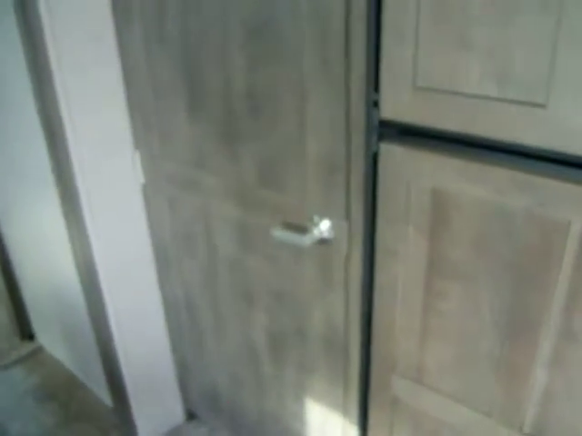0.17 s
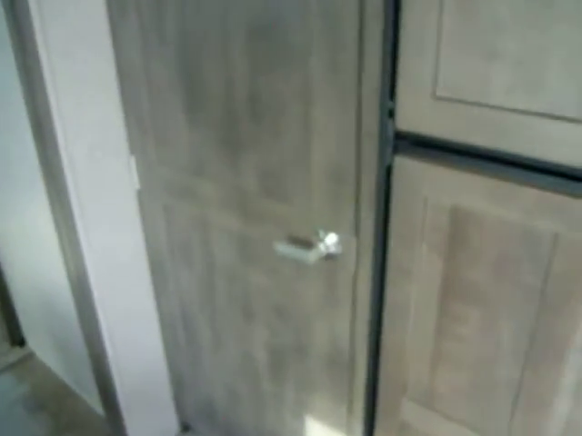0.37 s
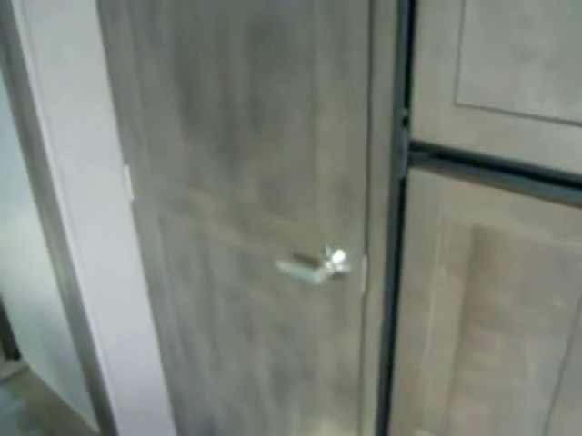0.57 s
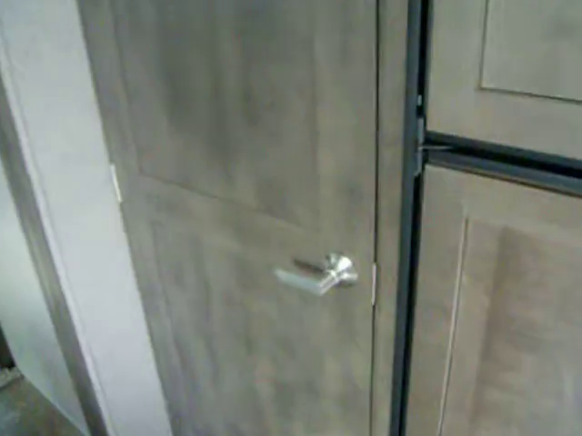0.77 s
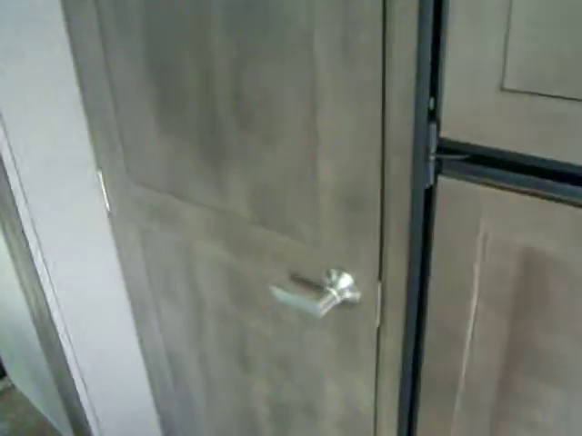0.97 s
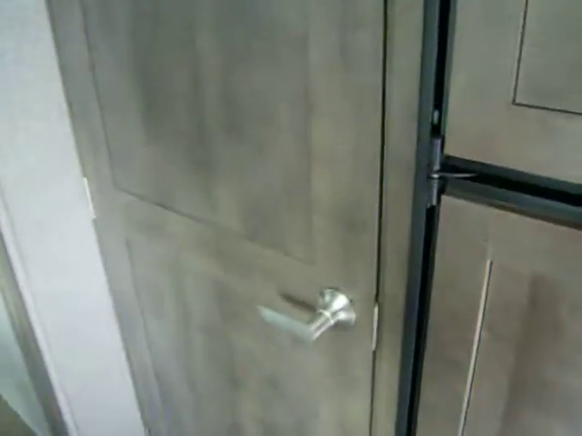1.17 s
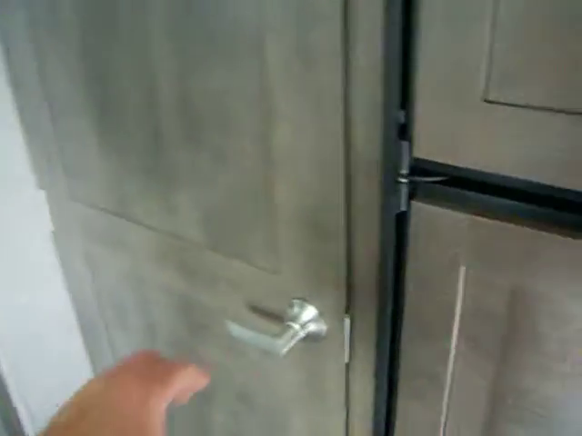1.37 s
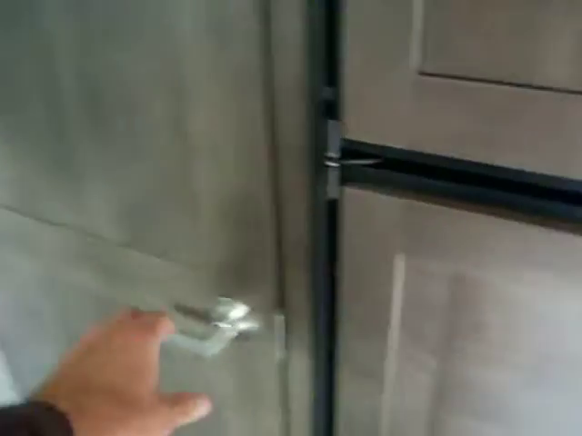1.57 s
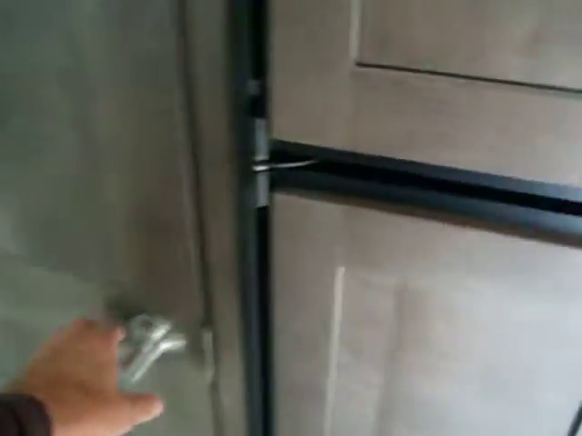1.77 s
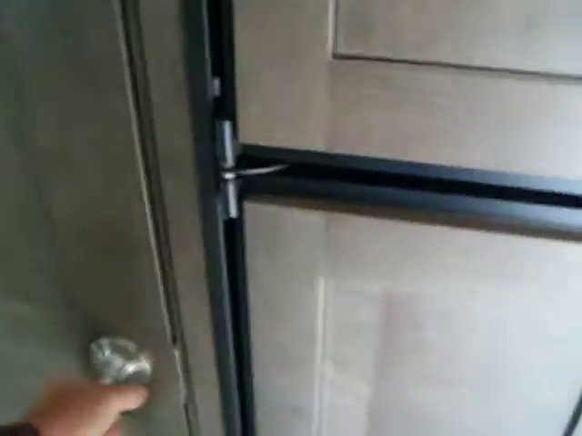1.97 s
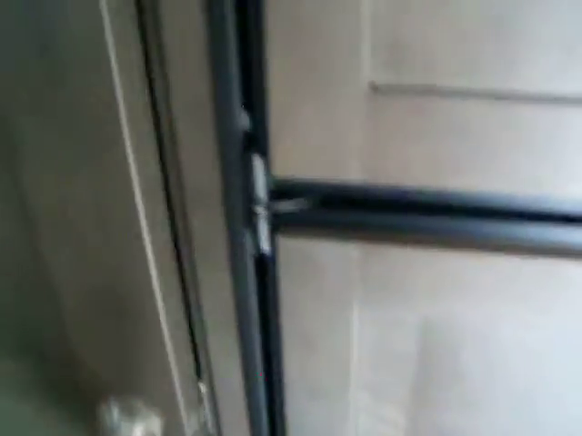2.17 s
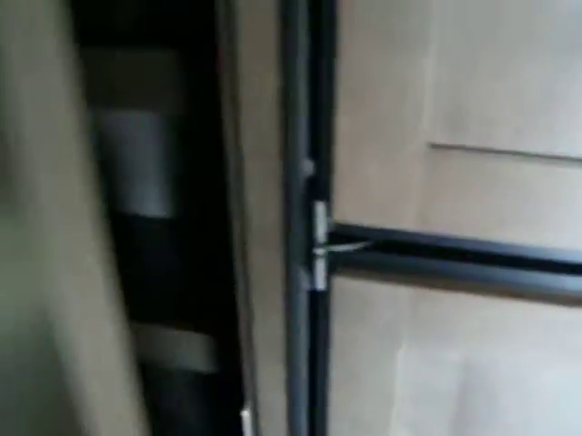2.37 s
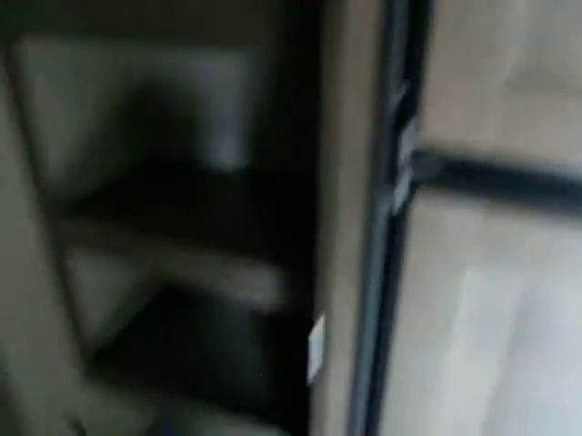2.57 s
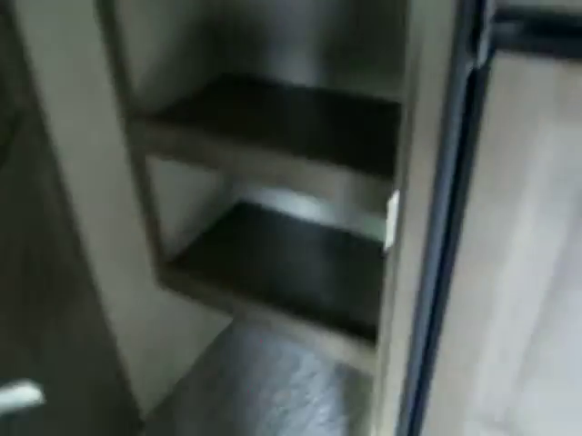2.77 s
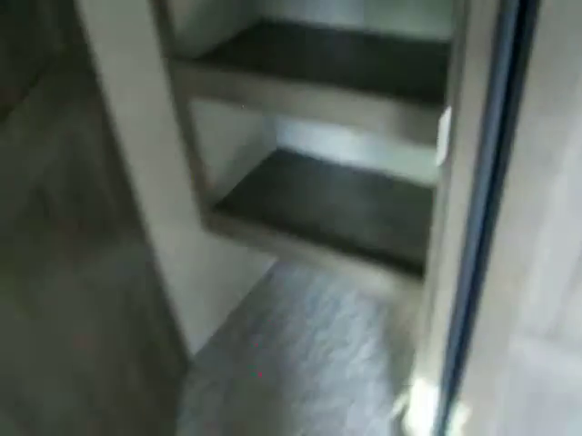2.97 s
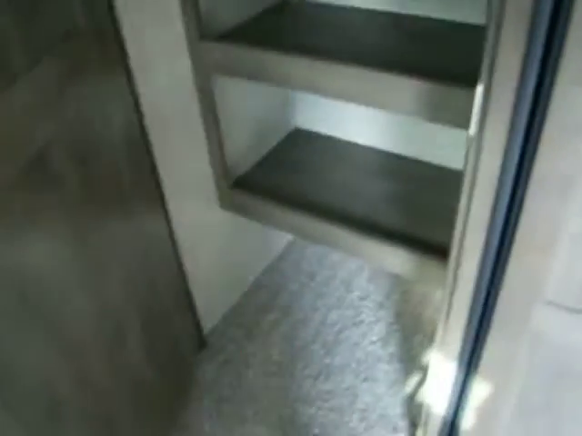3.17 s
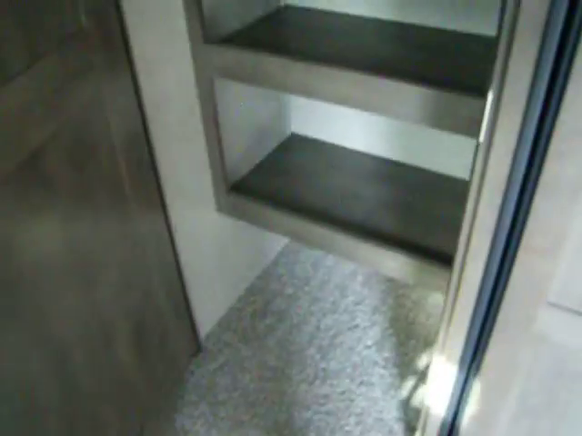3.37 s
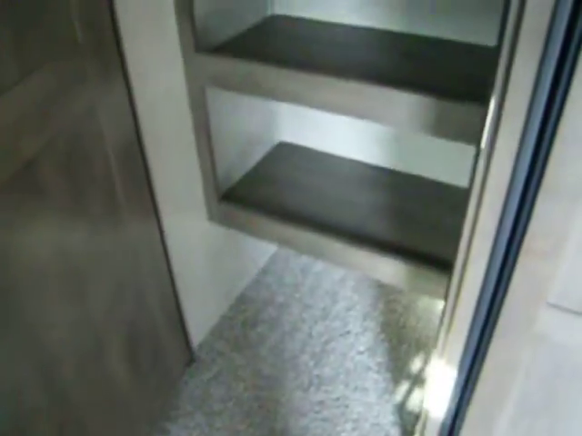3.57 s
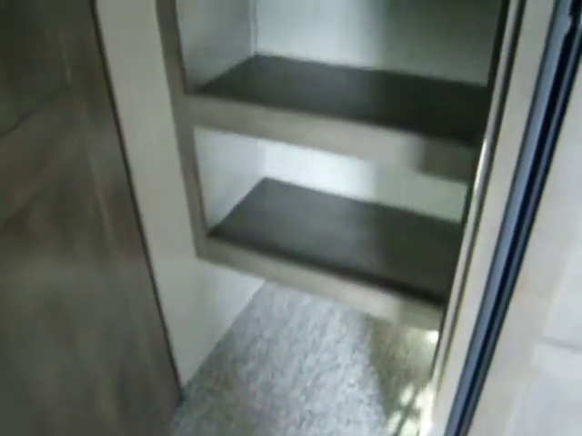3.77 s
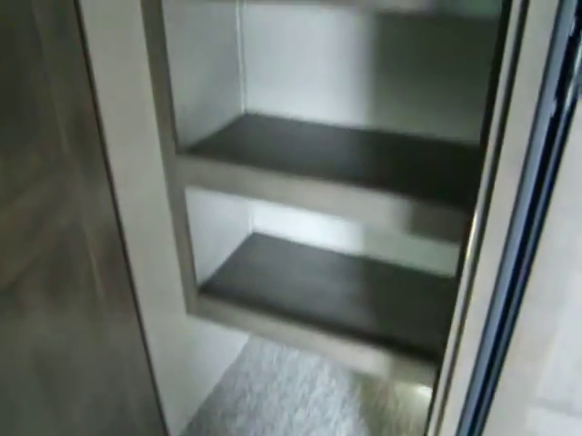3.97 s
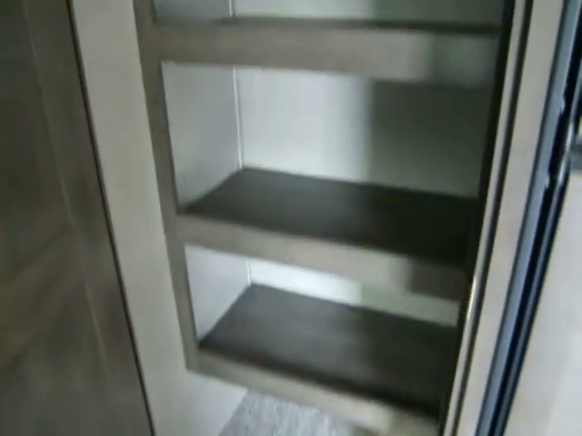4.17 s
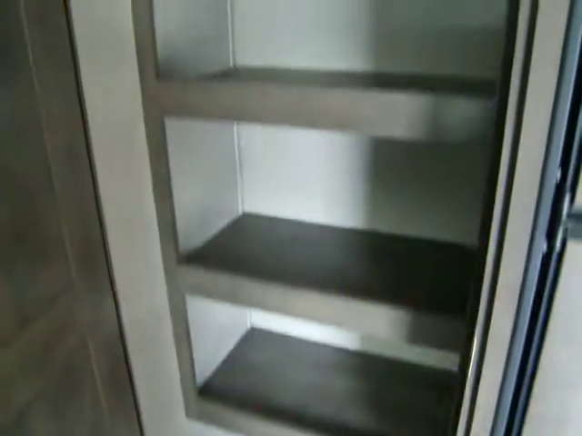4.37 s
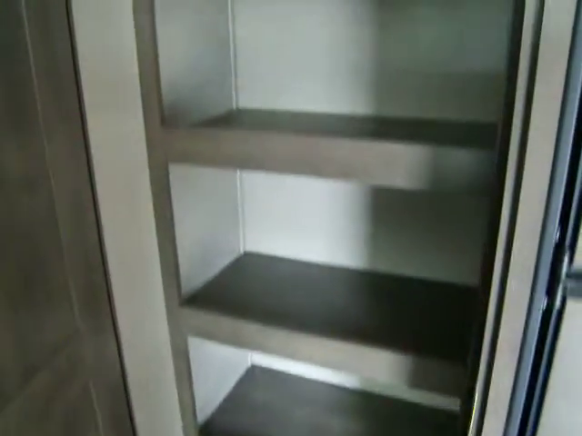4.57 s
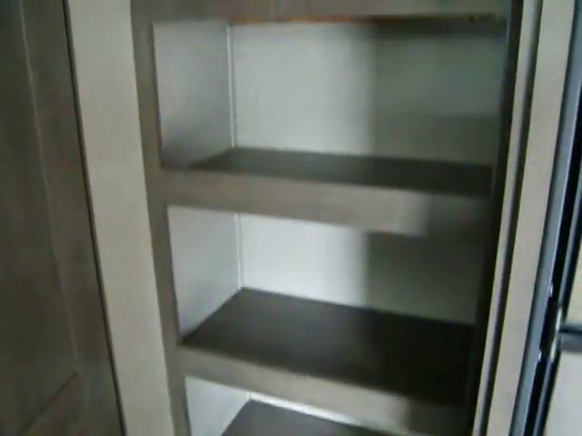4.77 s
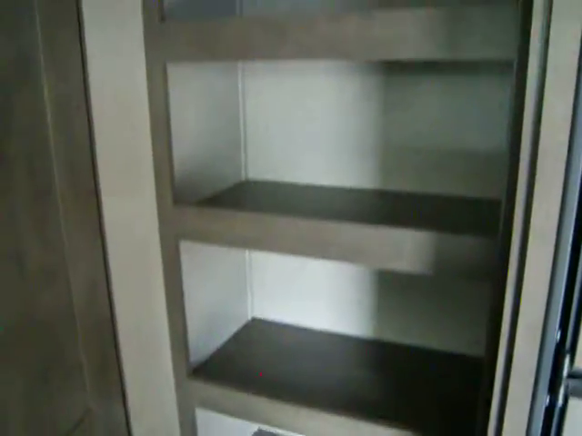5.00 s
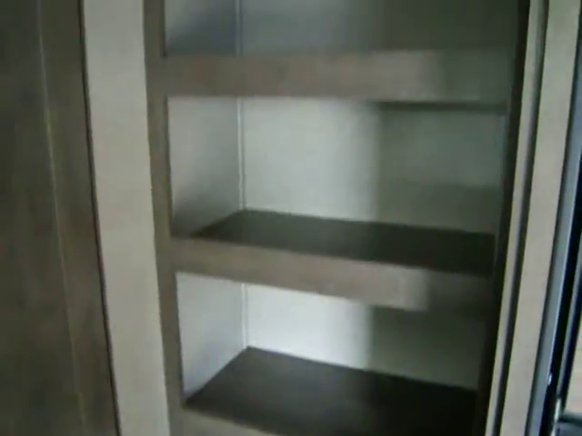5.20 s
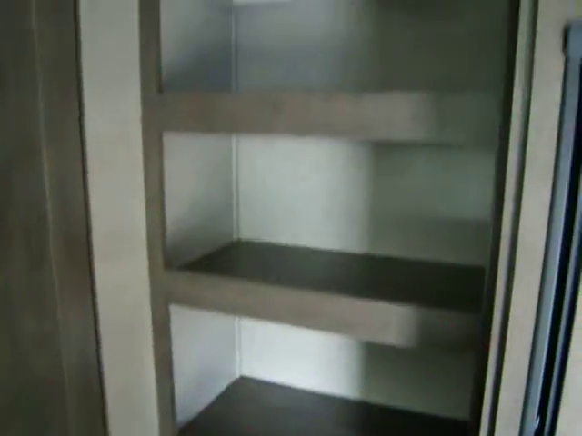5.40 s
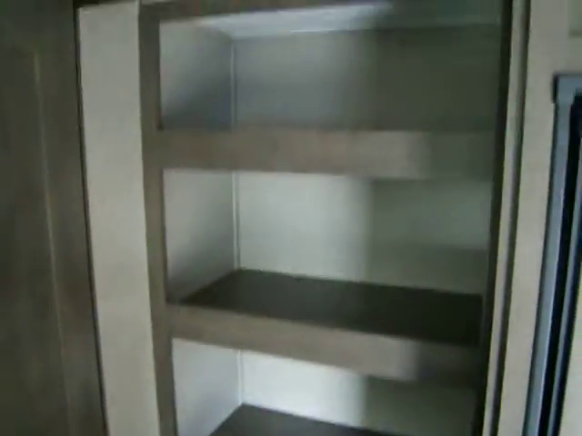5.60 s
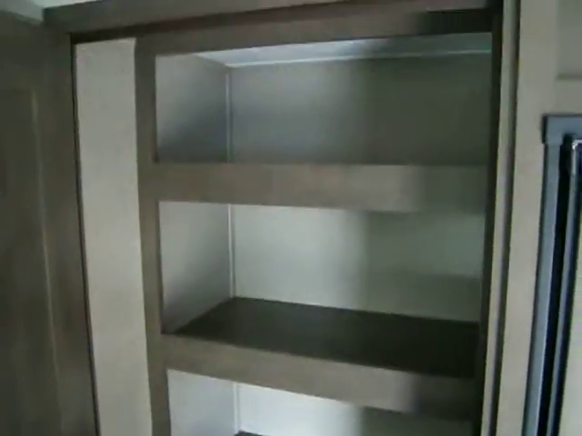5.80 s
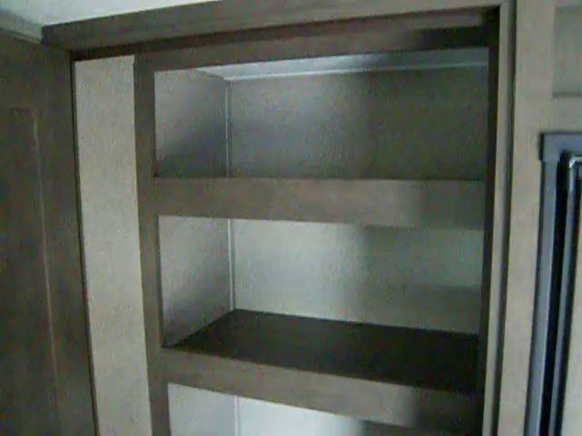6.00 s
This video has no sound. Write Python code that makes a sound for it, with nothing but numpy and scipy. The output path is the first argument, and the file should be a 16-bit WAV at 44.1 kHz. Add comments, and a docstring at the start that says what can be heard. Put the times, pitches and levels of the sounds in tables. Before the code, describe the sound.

A closet door's lever latch rattles and snaps open loudly, over hiss, low hum and a camera's faint focus ticking.

```python
"""Hiss and a low hum come first, then the ticks and buzzing steps of a camera's focus motor close by.
A hand turns the lever of a light closet door in a small room: impacts ring the modes of latch and panel,
and the latch rattles, snaps at 2 s and overloads the microphone. Hand and feet thud and rub, the floor
groans, the hinge scrapes. Hiss and hum sink after the snap and swell back."""
import sys
import numpy as np
from scipy import signal
from scipy.fft import rfft, irfft
from scipy.io import wavfile
from scipy.ndimage import uniform_filter1d

SR = 44100
rng = np.random.default_rng(int(sys.argv[2]) if len(sys.argv) > 2 else 0)


def master_out(mix):
    """Clip the mix to full scale and print it as 16-bit PCM to the path in sys.argv[1]."""
    frames = np.transpose(np.atleast_2d(mix))
    ceiling = np.clip(frames, -1, 1)
    pcm = np.round(ceiling * 32767).astype(np.int16)
    wavfile.write(sys.argv[1], SR, pcm)


N = 266452
T = np.arange(N) / SR

# impacts: t/s, metal level/dB, contact time/s, favoured metal f/Hz, panel level/dB, favoured panel f/Hz
IMPACTS = [(.424, -48, .008, 1400, -37, 580), (.438, -36.5, 0.0037, 1400, -28, 690),
           (1.454, -31, 0.0086, 3000, -16, 230), (1.827, -22.5, .007, 1300, -19.5, 560),
           (1.846, -45, 0.0071, 1400, -23.5, 310), (1.94, -19, .016, 5600, -43, 390),
           (1.9553, -6.5, 0.00067, 2580, -20, 390), (1.957, -13, 0.0036, 2345, -19.5, 390),
           (1.9787, -30, 0.0017, 6800, -33, 600), (1.972, -21.5, 0.0062, 2500, -27, 390),
           (1.98, -14.5, 0.0048, 2505, -24, 400), (1.9902, -12.5, 0.0023, 6660, -29, 600),
           (1.992, -11, 0.0046, 1980, -21, 850), (2.0131, 1.5, .00035, 2650, -26, 590),
           (2.0147, -5, .0016, 4800, -17, 590), (2.0149, -2, .0008, 7300, -24, 860),
           (2.0154, -9, .0012, 2650, -26, 1130), (2.0175, -13, 0.0061, 2380, -18.5, 600),
           (2.339, -33, 0.0072, 1960, -49, 900), (3.368, -45, 0.016, 1300, -31.5, 540),
           (3.397, -52, .012, 1400, -35, 650), (3.455, -48, 0.0064, 2200, -38, 1000)]
# modes of the metal latch and of the door panel: f/Hz, level/dB, T60/s
LATCH_MODES = [(1380, -6, .01), (2000, -3, .009), (2350, -2, .005), (2750, 0, .0052), (3550, -8, .006),
               (4250, -6, .006), (4880, 0, .008), (5600, -8, .007), (6500, -5, .006), (7400, -6, .006)]
PANEL_MODES = [(160, -0.5, 0.13), (235.6, -2, 0.059), (301.6, -3.5, 0.093), (400, 2.5, 0.042),
               (510, -4.5, 0.05), (623, -1, 0.054), (690, 5.5, 0.016), (917, 0, 0.06), (1120, 0, .03)]
def latch():
    """Impact excitation: an impulse and brief chatter set latch and panel into free vibration."""
    out = np.zeros(N)
    for s, metal_db, contact, metal_hz, panel_db, panel_hz in IMPACTS:
        chatter = rng.standard_normal(1500) * np.exp(-(T[:1500] / contact) ** 4)
        force = signal.unit_impulse(1500) + .3 * min(contact / .004, 1) * chatter  # short contacts are clean
        for modes, db, centre in (LATCH_MODES, metal_db, metal_hz), (PANEL_MODES, panel_db, panel_hz):
            add(out, s, gain_of(db) * struck(modes, force, lambda hz: -20 * abs(np.log2(hz / centre))))
    return out


# stops of the focus motor: t/s, level/dB, favoured f/Hz
MOTOR_STOPS = [(0.627, -8, 4800), (0.7772, -13.5, 5140), (0.8388, -8.5, 5400), (0.9525, -15, 6700),
               (1.0157, -6, 4830), (1.125, -19, 5800), (1.1919, -10, 5170), (1.285, -21, 5600),
               (1.3224, -21.5, 5500), (1.3633, -8, 5240), (1.5375, -10, 5440), (1.6536, -14.5, 4700),
               (1.715, -9.5, 4840), (1.83, -17, 4210), (1.8929, -11, 5500), (2.0862, -21, 4110),
               (2.1779, -29.5, 4650), (2.258, -21, 5100), (2.366, -36, 6460), (2.4283, -23.5, 4280),
               (2.528, -33, 5490), (5.2964, -9, 4720), (5.401, -20, 5800), (5.4626, -9.5, 4710),
               (5.5662, -14, 5540), (5.6295, -10, 4700), (5.7304, -19.5, 5780), (5.7963, -8.5, 5200),
               (5.9007, -16.5, 5400), (5.963, -6.5, 5430)]
# modes of its housing: f/Hz, level/dB, T60/s
HOUSING_MODES = [(2935, -0.5, 0.0061), (4200, -3, 0.0064), (4810, -2, 0.0053), (5500, -1.5, 0.0041),
                 (6800, -3.5, 0.0055), (7700, -11.5, 0.0044), (8530, -9.5, 0.0042)]
def motor_ticks():
    """Impulse response: the motor stops against its gears and rings a housing too small to radiate bass."""
    ticks = np.zeros(N)
    for s, db, centre in MOTOR_STOPS:
        def weight_db(hz):
            return 1.9 * np.log2(hz / 4900) + 4.8 * np.exp(-(np.log2(hz / centre) / .16) ** 2)
        rattle = .12 * rng.standard_normal(60) * np.exp(-T[:60] / .0005)
        tick = struck(HOUSING_MODES, signal.unit_impulse(60) + rattle, weight_db, rise=.00014)
        add(ticks, s - .0003, gain_of(db) * tick)
    return signal.sosfilt(signal.butter(3, 2400, "high", fs=SR, output="sos"), ticks)


STEP_S, REPEAT_S = .0102, .1667
HARD_STOP_DB, HARD_RUN_S, SOFT_RUN_S = -12, .075, .058
# motor runs that start without a stop: t/s, count, relative level/dB, duration/s
FREE_RUNS = [(0.678, 1, 8.5, 0.065), (1.415, 1, 7, 0.13), (3.628, 9, 8.5, 0.046)]
# resonances driven by the steps: f/Hz, bandwidth/Hz, level/dB
STEP_RESONANCES = [(5400, 830, -1), (6400, 270, -13.5), (3130, 960, -5.5), (1630, 360, 0.5),
                   (8650, 600, -18.5)]
def motor_steps():
    """Pulse-train excitation: each motor step drives resonances with a noise burst, so a run buzzes."""
    runs = [(s + 2 * STEP_S, 5.5, HARD_RUN_S) if db > HARD_STOP_DB else (s + STEP_S, 5.5, SOFT_RUN_S)
            for s, db, _ in MOTOR_STOPS]  # a run follows every stop
    runs += [(s + k * REPEAT_S, db, length) for s, count, db, length in FREE_RUNS for k in range(count)]
    pulse = np.minimum(T[:300] / .00056, 1) * np.exp(-T[:300] / .0031)
    envelope = np.zeros(N)
    for s, db, length in runs:
        run_db = db + background_db(s)  # runs sink and swell with the background
        for k, uneven_db in enumerate(1.9 * rng.standard_normal(12)):
            inside = np.clip(length / STEP_S - k, 0, 1)
            add(envelope, s + k * STEP_S, inside * gain_of(run_db + uneven_db) * pulse)
    bursts = envelope * rng.standard_normal(N)
    return gain_of(9.5) * sum(gain_of(db) * resonate(bursts, hz, bw) for hz, bw, db in STEP_RESONANCES)


# soft blows of hand and feet: t/s, level/dB, f/Hz, T60/s
SOFT_BLOWS = [(0.644, -19.5, 109, 0.073), (1.4537, -15.5, 152, 0.24), (1.47, -21, 91, 0.18),
              (2, -21.5, 90, 0.074), (1.596, -21, 438, 0.04), (1.838, -22, 65, 0.24),
              (1.919, -18.5, 69, 0.116), (2.414, -26.5, 174, 0.1)]
def thuds():
    """Damped oscillation: each soft blow excites a single low mode."""
    out, t = np.zeros(N), T[:SR // 3]
    onset = 1 - np.exp(-t / .00088)
    for s, db, hz, t60 in SOFT_BLOWS:
        add(out, s, -gain_of(db - 60 * t / t60) * np.sin(2 * np.pi * hz * t) * onset)
    return out


# sliding contacts: t/s, rise/s, hold/s, fall/s, level/dB, tilt/(dB per octave), wood level/dB
SLIDES = [(0.434, 0.046, .01, 0.078, -31, -8, -37), (1.459, .005, 0.024, 0.11, -24, -1.2, -32),
          (1.829, 0.0099, 0.0027, 0.012, -20.5, -5, -28), (1.85, 0.019, 0.029, .04, -54, -5, -34.5),
          (1.964, 0.063, 0.061, 0.046, -28, 1.3, -28), (2.03, 0.021, 0.0209, 0.13, -34.5, -3, -38.5),
          (2.209, .02, .02, .05, -54, 1, -57), (2.275, 0.044, 0.093, 0.034, -51.5, 1.5, -51.5),
          (2.429, .05, 0.035, 0.14, -58.5, 6.5, -50), (2.902, .12, 0.0084, .04, -52, 1, -55),
          (3.359, 0.029, 0.077, .04, -46, -1.3, -48.5), (3.46, .06, 0.011, 0.081, -36.5, -3, -51)]
# friction spectrum: f/Hz, level/dB
FRICTION_SPECTRUM = [(300, -18), (900, -5.5), (2500, -3), (4200, -3.5), (5300, -4.5), (5900, -3),
                     (6500, -3.5), (7500, -10)]
# resonances of the wood: f/Hz, bandwidth/Hz, level/dB
WOOD_RESONANCES = [(146, 60, 1.5), (295, 100, 7), (550, 58, 5), (650, 36, -9), (1000, 400, -9)]
def rubbing():
    """Sliding friction: hand, shoe and door edge make uneven noise that also shakes the wood."""
    out, n = np.zeros(N), SR // 2
    octaves = np.log2(np.fft.rfftfreq(n, 1 / SR) / 2000 + 1e-9).clip(-2, 2)
    for *timing, db, tilt_db, wood_db in SLIDES:
        start, envelope = stroke(*timing)
        friction = uneven_noise(n, depth_db=1.4, span=150)
        hiss = unit_rms(coloured(friction, FRICTION_SPECTRUM))
        hiss = irfft(rfft(hiss) * gain_of(tilt_db * octaves), n)
        wood = unit_rms(sum(gain_of(d) * resonate(friction, hz, bw) for hz, bw, d in WOOD_RESONANCES))
        rub = gain_of(db) * hiss + gain_of(wood_db) * wood
        add(out, start, rub[:len(envelope)] * envelope)
    return out


# groans of the floor: t/s, rise/s, hold/s, fall/s, level/dB, f/Hz
FLOOR_GROANS = [(0.651, 0.14, .01, 0.062, -34.5, 270), (0.746, 0.098, 0.042, 0.088, -32.5, 304),
                (0.879, 0.14, 0.019, 0.1, -38.5, 340), (4.868, 0.22, .14, .07, -45, 284.4),
                (5.139, .06, .01, .15, -47.5, 276)]
def floor_groans():
    """Forced vibration: under a shifting foot, noise drives one low resonance of the floor."""
    out = np.zeros(N)
    for *timing, db, hz in FLOOR_GROANS:
        start, envelope = stroke(*timing)
        tone = unit_rms(narrow_band(rng.standard_normal(SR), hz, bw=95))
        add(out, start, gain_of(db) * tone[-len(envelope):] * envelope)
    return out


# scrapes of the hinge: t/s, rise/s, hold/s, fall/s, level/dB
HINGE_SCRAPES = [(2.223, .03, .003, .04, -55), (2.274, 0.046, .01, 0.13, -46.5),
                 (2.47, 0.09, .005, .04, -54)]
# its resonances: f/Hz, bandwidth/Hz, level/dB
HINGE_RESONANCES = [(5250, 600, -2), (6340, 410, -1)]
def hinge():
    """Stick-slip friction: as the door swings, uneven slips ring two high resonances of the hinge."""
    slips = uneven_noise(N, depth_db=3.1, span=200)
    ring = sum(gain_of(db) * narrow_band(slips, hz, bw) for hz, bw, db in HINGE_RESONANCES)
    pressure = np.zeros(N)
    for *timing, db in HINGE_SCRAPES:
        start, envelope = stroke(*timing)
        add(pressure, start, gain_of(db) * envelope)
    return unit_rms(ring) * pressure


def room(x, t60=.12):
    """Reverberation: sparse reflections of random sign decay quickly in a small furnished room."""
    taps = np.zeros(SR // 3)
    slots = np.arange(200, len(taps) - 22, 22)
    taps[slots + rng.integers(0, 22, len(slots))] = rng.choice([-1., 1.], len(slots))
    taps *= gain_of(-60 * T[:len(taps)] / t60)
    return signal.fftconvolve(x, taps / np.linalg.norm(taps))[:N]


# noise spectra: f/Hz, relative level/dB
HISS_SPECTRUM = [(88, -30.5), (150, -1.5), (174, -6), (257, -7.5), (447, -8), (673, -8.5), (818, -9.5),
                 (1550, -13.5), (7400, -21.5), (9620, -28.5), (16300, -120)]
RUMBLE_SPECTRUM = [(8, -10.5), (20, -7), (70, -13), (110, -16.5), (200, -33.5), (400, -60)]
# wavering hum lines: f/Hz, bandwidth/Hz, level/dB
HUM_LINES = [(44.67, 6.3, 3), (135.55, 10.4, -7.5), (67.6, 9.3, -7), (100.4, 9, -12.5)]
# extra gain of hum and rumble: t/s, level/dB
LOW_GAIN = [(0, 2.5), (.8, 3), (1.5, 0.5), (1.85, 2.5), (2.3, 2.5), (3.4, 2), (4.3, 5), (6.04, 1.5)]
def background():
    """Filtered noise: broad bands are heard as hiss and rumble, narrow ones as a wavering hum."""
    hiss_noise, hum_noise, rumble_noise = rng.standard_normal((3, N))
    hiss = gain_of(2) * unit_rms(coloured(hiss_noise, HISS_SPECTRUM))
    hum = sum(gain_of(db) * unit_rms(narrow_band(hum_noise, hz, bw)) for hz, bw, db in HUM_LINES)
    drift = unit_rms(uniform_filter1d(uniform_filter1d(rng.standard_normal(N), 3000), 3000))
    rumble = gain_of(2.5 * drift - 1) * unit_rms(coloured(rumble_noise, RUMBLE_SPECTRUM))
    low = (hum + rumble) * gain_of(np.interp(T, *np.transpose(LOW_GAIN)))
    return (hiss + low) * gain_of(background_db(T))


# gain of the whole background: t/s, level/dB
BACKGROUND_GAIN = [(0.0, -40), (0.39, -41.5), (0.87, -39.5), (1.21, -40.5), (1.82, -40), (1.95, -36),
                   (2.07, -47), (2.3, -51.5), (2.55, -53.5), (3.4, -55), (3.53, -49.5), (3.8, -47),
                   (4.66, -43.5), (6.04, -40.5)]
def background_db(t):
    """Slow amplitude modulation: the level sinks after the snap and swells back."""
    return np.interp(t, *np.transpose(BACKGROUND_GAIN))


def struck(modes, force, weight_db, rise=1e-5):
    """Modal synthesis: a force convolved with damped sinusoids weighted by weight_db(hz); peak 1."""
    t = T[:SR // 5]
    ring = sum((-1) ** k * gain_of(db + weight_db(hz) - 60 * t / t60) * np.sin(2 * np.pi * hz * t)
               for k, (hz, db, t60) in enumerate(modes))
    sound = signal.fftconvolve(force, ring * (1 - np.exp(-(t / rise) ** 2)))
    return sound / abs(sound).max()


def resonate(x, hz, bw):
    """Resonance by heterodyning: shift hz to zero, low-pass to bandwidth bw, shift back."""
    carrier = np.exp(2j * np.pi * np.cumsum(np.full(len(x), hz)) / SR)
    pole = np.exp(-np.pi * bw / SR)
    return 2 * (carrier * signal.lfilter([1 - pole], [1, -pole], x / carrier)).real


def narrow_band(x, hz, bw):
    """Two equal resonators in cascade give steeper skirts."""
    return resonate(resonate(x, hz, bw), hz, bw)


def coloured(x, spectrum):
    """Spectral shaping by points of f/Hz, level/dB."""
    hz, db = np.transpose(spectrum)
    bins = np.fft.rfftfreq(len(x), 1 / SR)
    return irfft(rfft(x) * gain_of(np.interp(np.log(bins + 1), np.log(hz + 1), db)), len(x))


def uneven_noise(n, depth_db, span):
    """Random amplitude modulation of white noise, smoothed over span samples."""
    noise, lumps = rng.standard_normal((2, n))
    return noise * gain_of(depth_db * unit_rms(uniform_filter1d(lumps, span)))


def stroke(s, rise, hold, fall):
    """Start time and envelope of a gesture: exponential growth until s, hold, exponential decay."""
    t = np.arange(-rise, hold + fall, 1 / SR)
    db = -20 * (np.maximum(-t / rise, 0) + np.maximum(t - hold, 0) / fall)
    return s - rise, gain_of(db) * signal.windows.tukey(len(t), .1)


def gain_of(db):
    """Decibels to amplitude."""
    return 10 ** (np.asarray(db) / 20)


def unit_rms(x):
    """Normalisation to rms 1."""
    return x / np.sqrt(np.mean(x ** 2) + 1e-20)


def add(mix, s, sound):
    """Superposes a sound from time s."""
    part = mix[round(s * SR):][:len(sound)]
    part += sound[:len(part)]


def scene():
    """Superposition of door, floor, motor and background; only the latch impacts reverberate."""
    friction = rubbing() + floor_groans()
    impacts = latch()
    door = impacts + gain_of(-22.5) * room(impacts) + hinge()
    return (door + thuds() + friction + motor_ticks() + motor_steps() + background())[None]


OVERLOAD, CUTOFF_HZ = .66, 15900
# microphone response: f/Hz, level/dB
MIC_RESPONSE = [(20, -4.5), (7400, -0.5), (7800, -8), (8000, -16.5), (8300, -12.5), (8800, -21.5),
                (9100, -59), (9500, -93)]
def record(dry):
    """Saturation: the snap overloads a narrow-band microphone; a low-pass limits the distortion band."""
    saturated = np.clip(coloured(dry[0], MIC_RESPONSE), -OVERLOAD, OVERLOAD)
    lowpass = signal.firwin(511, CUTOFF_HZ, window=("kaiser", 9), fs=SR)
    return signal.oaconvolve(saturated, lowpass, "same")[None]


dry = scene()
out = record(dry)
master_out(out)
```